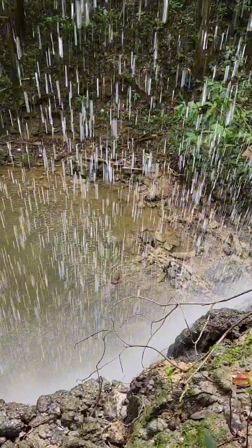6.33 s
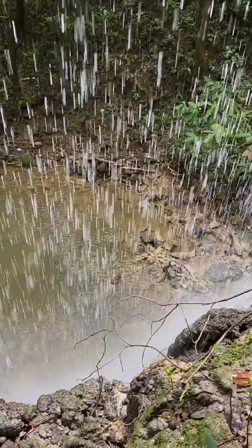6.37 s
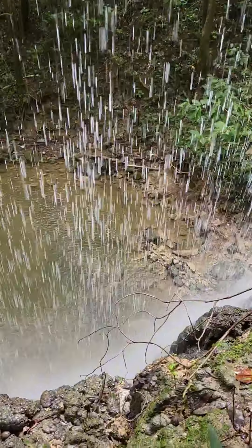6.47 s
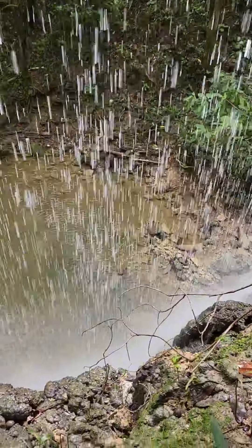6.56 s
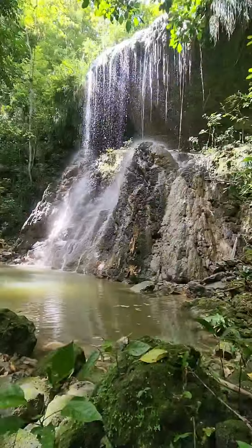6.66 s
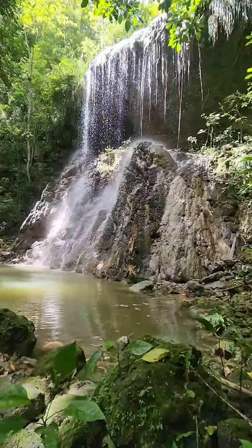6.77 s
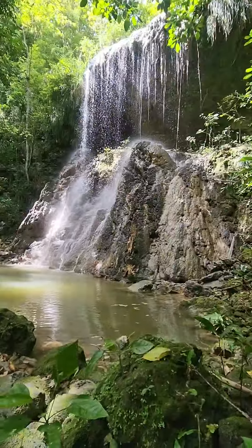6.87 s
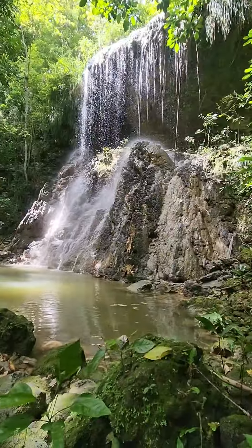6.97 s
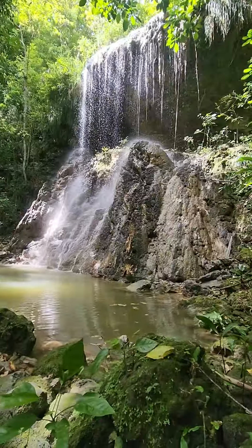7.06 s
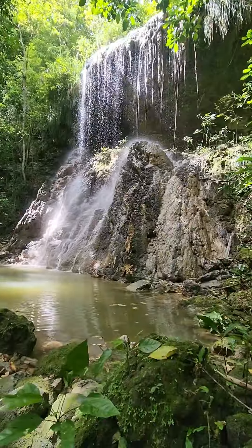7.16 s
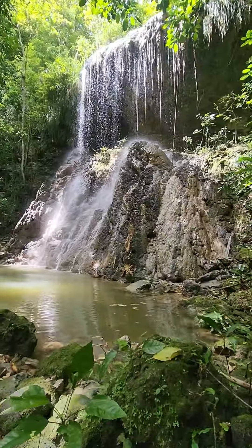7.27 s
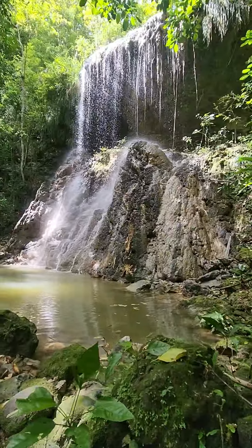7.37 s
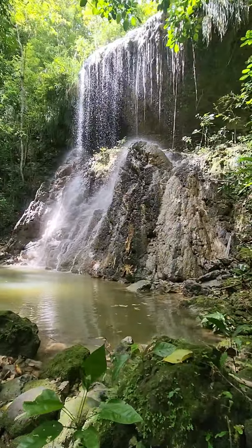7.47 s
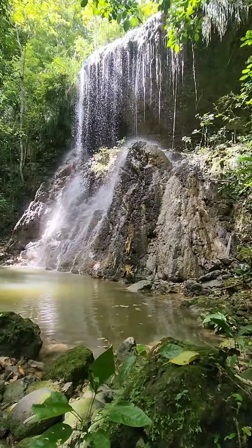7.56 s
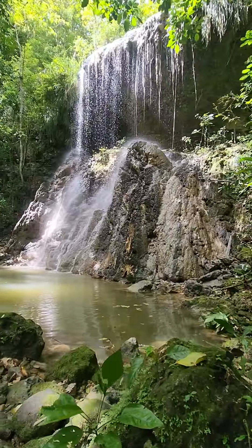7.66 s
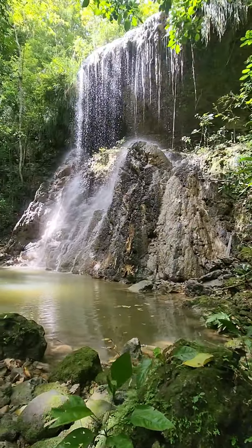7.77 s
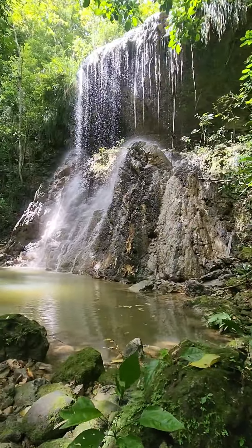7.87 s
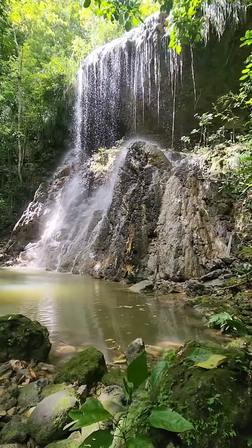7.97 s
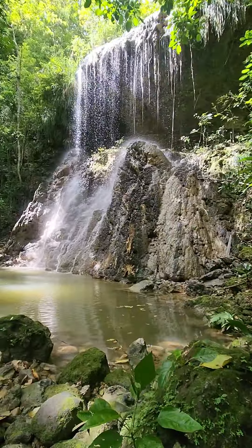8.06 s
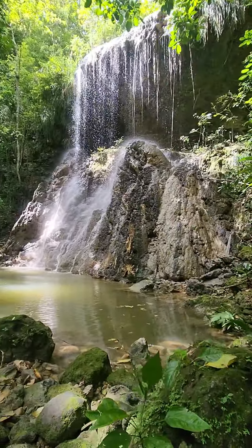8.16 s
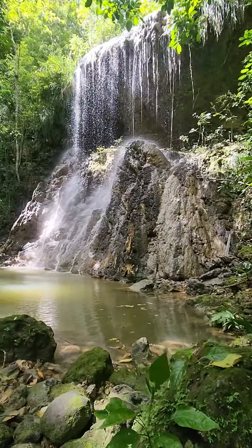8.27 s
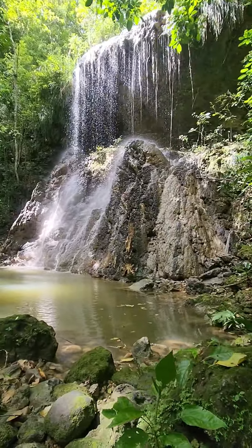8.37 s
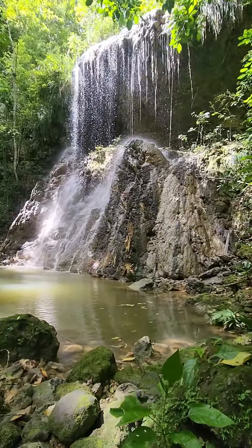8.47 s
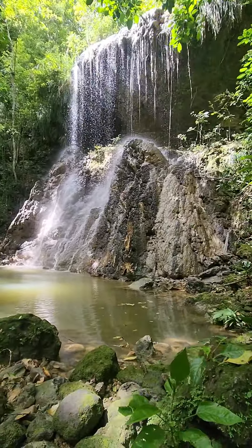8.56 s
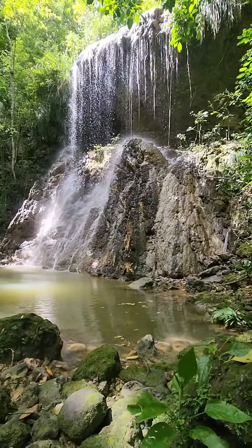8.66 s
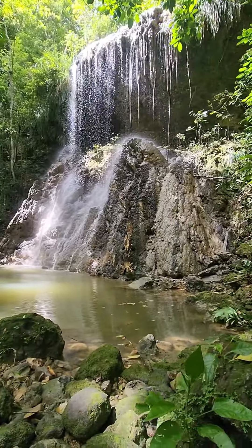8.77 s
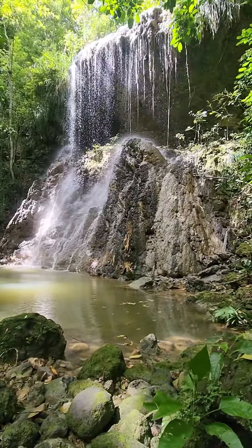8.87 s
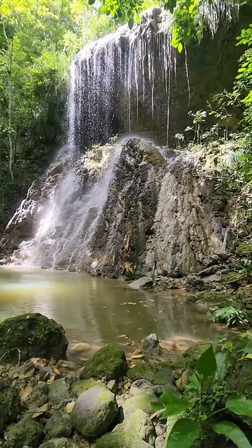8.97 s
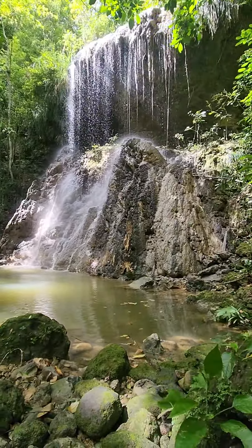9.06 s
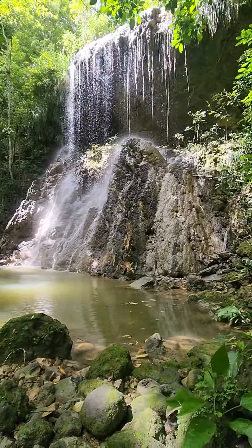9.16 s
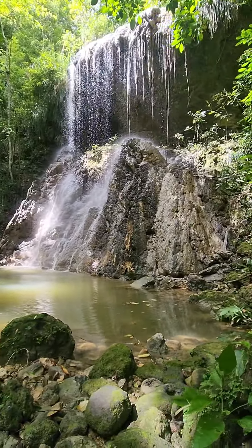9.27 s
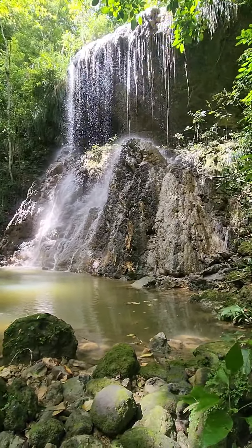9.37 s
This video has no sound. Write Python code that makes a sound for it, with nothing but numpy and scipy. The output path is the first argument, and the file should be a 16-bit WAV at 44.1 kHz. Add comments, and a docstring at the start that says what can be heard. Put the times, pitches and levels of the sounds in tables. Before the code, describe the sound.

Close under a small forest waterfall, a dense, bright stereo hiss of falling drops spatters on wet rock and into a shallow pool. Sharp ticks and wider wet slaps stand out, with small bubbles and faint low puffs of air. At about 6.6 seconds it cuts to a split second of silence, then a softer, smoother, steady hiss from across the pool continues to the end.

```python
"""A small forest waterfall, first from close by: its curtain of drops spatters on wet rock and into the pool.
Shaped noise makes the rush of countless splashes; random impacts add drops of every size, ringing tones add bubbles.
Near drops tick and slap out of it as noise bursts; a draught nudges the microphones as low, soft puffs of noise.
After a cut to a moment of silence, the fall is heard from across the pool as a smoother, softer hiss."""
import sys
import numpy as np
from scipy import signal
from scipy.fft import rfft, irfft, next_fast_len
from scipy.io import wavfile

SR = 44100
rng = np.random.default_rng(int(sys.argv[2]) if len(sys.argv) > 2 else 0)


def put_to_file(sound):
    """Save the sound as 16-bit audio at rate SR, in the file named by the first command-line argument."""
    columns = np.atleast_2d(sound).T  # one column per channel
    safe = np.clip(columns, -1, 1)
    whole_steps = np.round(safe * 32767)
    wavfile.write(sys.argv[1], SR, whole_steps.astype(np.int16))


N = 414981
TIME_S = np.arange(N) / SR

# spectrum at the foot of the fall, ahead of the view's trim: (frequency [Hz], left gain [dB], right gain [dB])
NEAR_SPECTRUM = [(170, -33, -32.5), (607, -31, -31.5), (1475, -25, -21), (2400, -22.5, -21.5),
                 (3320, -20.5, -22.5), (5330, -18, -9), (7040, -16.5, -9.2), (7330, -13.5, -6),
                 (7864, -17.5, -10.5), (8780, -27.5, -25.5), (10900, -23, -29), (12070, -20.5, -16.5),
                 (13350, -17.5, -16.5), (15700, -18.5, -29.7)]
# spectrum across the pool, ahead of the view's trim: (frequency [Hz], left gain [dB], right gain [dB])
FAR_SPECTRUM = [(140, -34, -34), (260, -38.5, -38), (650, -33, -33.7), (2150, -26.5, -25.5),
                (2800, -27, -29.5), (5500, -24, -20.5), (6900, -22.5, -21), (7500, -20.5, -17.5),
                (8050, -27.1, -21), (8860, -32.5, -35.5), (11000, -29.5, -36.4), (11900, -26, -24.5),
                (13100, -23.5, -25.9), (15700, -30.3, -26)]
# diffuse sound at two spaced microphones: (frequency [Hz], left-right correlation [-1..1])
DIFFUSE_CORRELATION = [(40, 0.96), (300, 0.92), (750, 0.54), (1200, 0.08), (1800, 0.17), (4000, -0.27),
                       (7000, 0.049)]
# slow turn of the microphones; each column is centred on its mean, then scaled where used:
# (time [s], fine spray [dB], left-right difference of the spatter [dB], churning [dB])
MICROPHONE_TURN = [(0, -26.5, -8.5, -40.7), (1, -25, -9.5, -41), (2, -24, -10, -41.5), (3, -23, -8, -40.5),
                   (4.2, -21.6, -7.5, -40.5), (5, -22, -7.2, -40.6), (6.5, -23, -6, -41)]
# thicker packets of water break off the curtain and land; swells are centred on their mean later:
# (time [s], swell of the pool's drops [dB], swell of the spatter on rock [dB])
WATER_PACKETS = [(0.01, 0.5, 3), (0.24, 2.5, 0), (0.43, 4, 0), (0.56, 2, 3), (0.97, 0, 1.5), (1.21, 1, 0.5),
                 (1.76, 1.5, 1), (3.27, 1, 1.5), (3.54, .5, 2), (3.84, 2.5, 2), (4.28, .5, 1.5),
                 (4.50, 1, 0.5), (4.88, 2.5, 2.5), (5.17, 3, 1.5), (5.92, 3, 2), (6.17, 1, 3),
                 (6.38, -1, 2.5)]
# thin stream that patters on wet stone, then wanders off it: (time [s], level ahead of band-pass and surges [dB])
STREAM_LEVEL = [(0, -1), (1.2, -0.5), (1.9, -5), (3.0, -14), (6.6, -18)]
# delay of the pool's drops at the left microphone: (time [s], lag [s])
POOL_LEFT_LAG = [(0, 0.0004), (1.5, 0.00034), (3.0, 0.00013), (6.6, 0.00012)]
# kinds of drop, heavy to fine: (low edge [Hz], high edge [Hz], rate ahead of clumping [1/s],
# size spread [dB per e-fold of chance], burst decay [s], level ahead of band-pass and mix [dB])
HEAVY_DROPS = (900, 4080, 560, 3.9, 0.0012, 1)
MEDIUM_DROPS = (1600, 8998, 380, 4, 0.1, -3.5)
LIGHT_DROPS = (4000, 7870, 1600, 2.9, 0.00047, 0.28)
FINE_DROPS = (8150, 16200, 1600, 4, 0.00064, 1.54)
# close drops bursting on rock: (time [s], level ahead of the common trim [dB], left-right difference [dB])
ROCK_TICKS = [(0.0512, -7.5, -6), (0.4312, -9.5, -11), (0.5622, -10.5, -14), (0.596, -10.5, -7),
              (0.6288, -10.5, -14), (1.2388, -8, -14), (1.4655, -8, -11), (1.5772, -9.5, -13),
              (2.0375, -11, -14), (2.0615, -10.5, -13), (2.375, -10, -10), (3.2922, -8, -6),
              (3.424, -2, -1), (4.5042, -9.5, -4), (4.9296, -7.5, -7), (5.2096, -6.5, -7),
              (5.5133, -6.5, -5), (6.1912, -9.5, -9), (6.2953, -11, -13)]
# close, heavy drops hitting the pool:
# (time [s], level ahead of the common trim [dB], left-right difference [dB], centre [Hz])
POOL_SLAPS = [(0.2309, -16.5, -3.5, 1900), (0.3915, -15, -3.5, 3000), (0.4728, -13.5, -5, 2300),
              (0.9852, -13.5, 1, 3700), (1.1837, -15.5, 0, 2800), (1.2116, -12.5, -5, 2700),
              (1.296, -17, -1.5, 3100), (1.8208, -12, -4, 3700), (2.1026, -16, 1, 2700),
              (2.3999, -13.5, -2, 2900), (3.861, -17, 2, 2600), (4.2053, -14, 6, 2500),
              (4.5241, -12, 1.5, 2700), (4.8065, -15.5, 2, 2000), (5.141, -15, 2, 2800),
              (5.4779, -14.5, 0, 1700), (6.0127, -18, 0, 3100), (6.1609, -17, 2, 2000),
              (6.5407, -14.5, -4, 1500)]
# soft low puffs, likely air pushed out by the falling water:
# (time [s], level ahead of the bass cut [dB], left-right difference [dB], centre [Hz])
AIR_PUFFS = [(2.38, -51, -2, 45), (2.62, -47.5, 5, 45), (2.92, -47, 6, 48), (3.23, -44, -6, 42),
             (3.63, -49, 1, 42), (4.52, -48.5, 1, 135), (4.98, -48, 7, 36)]

NEAR_END_S, FAR_START_S = 6.605, 6.703
PACKET_HALF_WIDTH_S = 0.048   # to 1/e
SWAY_CORNER_HZ, POOL_SWAY_DB, ROCK_SWAY_DB = 6.6, 0.64, 0.4
FAR_SWAY_CORNER_HZ, FAR_SWAY_DB = 5.6, 0.23   # distance evens the swaying out
ROCK_TRIM_DB = 0.2
CLOSE_DROP_S = 0.15   # longest splash
PUFF_HALF_WIDTH_S, PUFF_OWN_DB = 0.07, -6   # to 1/e; rumble that each channel has to itself
BASS_CUT_HZ, TOP_CUT_HZ = 33, 15780


def from_db(db):
    """Decibels to gain."""
    return 10 ** (np.asarray(db) / 20)


def rms_one(x):
    """Scale to unit power."""
    return x / np.sqrt(np.mean(x ** 2) + 1e-20)


def curve(rows):
    """Join a two-column time table, sample by sample."""
    return np.interp(TIME_S, *np.transpose(rows))


def swings_db(rows):
    """Each column of a time table, less the mean of its knots."""
    knots_s, *columns = np.transpose(rows)
    return [np.interp(TIME_S, knots_s, c - c.mean()) for c in columns]


def sides(pan_db):
    """Left and right gains for a level difference."""
    return from_db(np.array([[0.5], [-0.5]]) * pan_db)


def shaped(x, gain_at):
    """Filter by a gain that is a function of frequency."""
    size = next_fast_len(N + 4096)   # padding keeps the ends apart
    hz = np.maximum(np.arange(size // 2 + 1) * SR / size, 1)
    return irfft(rfft(x, size) * gain_at(hz), size)[..., :N]


def at_hz(rows, hz):
    """Columns of a frequency table, joined on a log-frequency axis."""
    knots_hz, *columns = np.transpose(rows)
    return np.array([np.interp(np.log(hz), np.log(knots_hz), c) for c in columns])


def coloured(x, spectrum):
    """Give each channel the colour of its place and its microphone port."""
    return shaped(x, lambda hz: from_db(at_hz(spectrum, hz)))


def band(x, low_hz, high_hz):
    """Causal band-pass."""
    sos = signal.butter(2, [low_hz, high_hz], "band", fs=SR, output="sos")
    return signal.sosfilt(sos, x)


def drift(corner_hz):
    """Slow random wander of unit rms: noise through a two-pole low-pass."""
    step, settle = 40, 2000   # samples per slow value; slow values dropped
    pole = np.exp(-2 * np.pi * corner_hz * step / SR)
    noise = rng.standard_normal(N // step + settle + 2)
    slow = signal.lfilter([1], [1, -2 * pole, pole ** 2], noise)[settle:]
    return np.interp(np.arange(N) / step, np.arange(len(slow)), rms_one(slow))


def surging_db():
    """Flow onto pool and rock about its mean: bell-shaped packets of water on a gentle random sway."""
    packet_s, pool_db, rock_db = np.transpose(WATER_PACKETS)
    bells = np.exp(-((TIME_S - packet_s[:, None]) / PACKET_HALF_WIDTH_S) ** 2)
    sway = drift(SWAY_CORNER_HZ)
    pool = pool_db @ bells + POOL_SWAY_DB * sway
    rock = rock_db @ bells + ROCK_SWAY_DB * sway
    return pool - pool.mean(), rock - rock.mean()


def rush():
    """Splashes too many to tell apart: white noise, much alike in both channels only in the bass."""
    mid, side = rng.standard_normal((2, N))
    mid = shaped(mid, lambda hz: np.sqrt((1 + at_hz(DIFFUSE_CORRELATION, hz)) / 2))
    side = shaped(side, lambda hz: np.sqrt((1 - at_hz(DIFFUSE_CORRELATION, hz)) / 2))
    return mid + side * [[1], [-1]]


def churning(bed, churn_db):
    """The pool's churning: the low part of the rush, with a swing of its own."""
    low = shaped(bed, lambda hz: 0.85 / (1 + (hz / 850) ** 4))
    return low * from_db(2.0 * churn_db)


def die_away(energy, decay_s):
    """Spread each impulse of energy over an exponential tail."""
    pole = np.exp(-1 / (decay_s * SR))
    return signal.lfilter([1 - pole], [1, -pole], energy + 1e-18)


def splash(energy, burst_s, spray_share, spray_s):
    """Impact noise whose power is shared by two decays, the burst and the spray it throws up."""
    burst = (1 - spray_share) * die_away(energy, burst_s)
    spray = spray_share * die_away(energy, spray_s)
    return np.sqrt(burst + spray) * rng.standard_normal(energy.shape)


def drops(kind, clumping_db, scatter_db, spray_share, spray_s):
    """Drops of one kind land at random, in clumps, each with its own size and direction."""
    low_hz, high_hz, per_s, spread_db, burst_s, level_db = kind
    chance, size, direction = rng.random((3, N))
    lands = np.flatnonzero(chance < per_s * from_db(clumping_db) / SR)
    size_db = -spread_db * np.log(size[lands] + 0.015)
    pan_db = scatter_db * (2 * direction[lands] - 1)
    energy = np.zeros((2, N))
    energy[:, lands] = (from_db(size_db) * sides(pan_db)) ** 2
    noise = splash(energy / energy.mean(), burst_s, spray_share, spray_s)
    return from_db(level_db) * band(noise, low_hz, high_hz)


def bubbles(per_s, low_hz, high_hz, cycles, spread_db):
    """Trapped air rings briefly, the small bubbles highest, each rising a little in pitch; rms 1."""
    out = np.zeros((2, N + SR))
    for when, pitch, size, pan in rng.random((int(per_s * N / SR), 4)):
        hz = low_hz * (high_hz / low_hz) ** pitch
        life = np.arange(0, 1, hz / (cycles * SR))   # 0 to 1 over the ring
        phase = 2 * np.pi * cycles * life * (1 + 0.03 * life)
        tone = hz * np.sin(phase) * from_db(-60 * life)
        size_db = -spread_db * np.log(size + 0.03)
        start = int(when * N)
        out[:, start:start + len(tone)] += tone * from_db(size_db) * sides(16 * (pan - 0.5))
    return rms_one(out[:, :N])


def from_the_right(x, lag_s, likeness):
    """Part of what the right microphone hears reaches the left one a moment later."""
    late = np.interp(TIME_S - lag_s, TIME_S, x[1])
    return np.array([np.sqrt(1 - likeness ** 2) * x[0] + likeness * late, x[1]])


def pool_splashes(clumps, pool_db, churn_db):
    """Heavy drops and a thin stream, delayed in part on the left, with bubbles."""
    heavy_clumping_db = 1.6 * clumps + 1.8 * drift(14)
    heavy = drops(HEAVY_DROPS, heavy_clumping_db, scatter_db=4.5, spray_share=0.32, spray_s=0.0092)
    heavy *= from_db(pool_db + 1.4 * churn_db)
    stream_kind = (2000, 4700, 298.5, 4.5, 0.2, 0)   # columns as for the kinds of drop
    stream = drops(stream_kind, 2.2 * drift(11), scatter_db=3, spray_share=0.36, spray_s=0.0057)
    stream *= from_db(curve(STREAM_LEVEL) + pool_db)
    pool = from_the_right(heavy + stream, curve(POOL_LEFT_LAG), likeness=0.53)
    ringing = bubbles(per_s=330, low_hz=502, high_hz=7420, cycles=52, spread_db=4.0)
    return pool + from_db(-12.5) * ringing


def rock_spatter(clumps, rock_db, turn_db):
    """Medium and light drops on rock, surging and panned by the turn of the microphones."""
    medium = drops(MEDIUM_DROPS, 2.3 * clumps, scatter_db=11, spray_share=0.46, spray_s=0.0081)
    light_clumping_db = 1.0 * clumps + 1.0 * drift(22)
    light = drops(LIGHT_DROPS, light_clumping_db, scatter_db=7, spray_share=0.35, spray_s=0.007)
    return (medium + light) * from_db(rock_db + ROCK_TRIM_DB) * sides(1.4 * turn_db)


def fine_spray(clumps, spray_db):
    """The finest drops, a high patter that swings as the microphones turn."""
    clumping_db = 1.2 * clumps + 1.6 * drift(11)
    fine = drops(FINE_DROPS, clumping_db, scatter_db=6, spray_share=0.42, spray_s=0.008)
    return fine * from_db(0.87 * spray_db)


def ground_echo(x, delay_s, strength, dull_hz):
    """Rough ground mirrors the lower tones, which ripples their spectrum."""
    def gain_at(hz):
        mirrored = strength / (1 + (hz / dull_hz) ** 2)
        return 1 + mirrored * np.exp(-2j * np.pi * hz * delay_s)
    return shaped(x, gain_at)


def close_drops(rows, width, crack_db, burst_s, spray_share, spray_s, trim_db):
    """Single drops by the microphones: a sharp crack and a noise burst, both in a band around the drop's pitch."""
    length = int(CLOSE_DROP_S * SR)
    out, impact = np.zeros((2, N)), np.zeros((2, length))
    impact[:, 0] = 1
    for at_s, level_db, pan_db, hz in rows:
        low_hz, high_hz = hz / width, hz * width
        burst = band(splash(impact * burst_s * SR, burst_s, spray_share, spray_s), low_hz, high_hz)
        # the burst passes the band twice, the crack once
        drop = band(burst + from_db(crack_db) * impact, low_hz, high_hz)
        start = int(at_s * SR)
        out[:, start:start + length] += from_db(level_db + trim_db) * sides(pan_db) * drop
    return out


def rock_ticks():
    """Close drops burst on rock: brief, high clicks."""
    rows = [(*tick, 5900) for tick in ROCK_TICKS]   # one centre for all [Hz]
    return close_drops(rows, width=1.31, crack_db=5, burst_s=0.0009,
                       spray_share=0.5, spray_s=0.0071, trim_db=5.5)


def pool_slaps():
    """Close, heavy drops hit the pool: wider, lower bursts."""
    return close_drops(POOL_SLAPS, width=1.67, crack_db=8.5, burst_s=0.0016,
                       spray_share=0.46, spray_s=0.0065, trim_db=6.0)


def near_fall():
    """Under the curtain: a bed of rush, the pool's churning and separate drops of every size."""
    pool_db, rock_db = surging_db()
    spray_db, turn_db, churn_db = swings_db(MICROPHONE_TURN)
    clumps = drift(15)   # the sheet of water tears into packets on its way down
    bed = rush()
    water = bed * from_db(0.77 * spray_db) + churning(bed, churn_db)
    water += pool_splashes(clumps, pool_db, churn_db)
    water += rock_spatter(clumps, rock_db, turn_db)
    water += fine_spray(clumps, spray_db)
    water = ground_echo(water, delay_s=0.00276, strength=0.1, dull_hz=1000)
    return from_db(-5.0) * coloured(water, NEAR_SPECTRUM) + rock_ticks() + pool_slaps()


def draught():
    """Puffs of air: band-passed noise under a bell-shaped swell, largely shared by both channels."""
    out = np.zeros((2, N))
    swell = np.exp(-((np.arange(SR) / SR - 0.5) / PUFF_HALF_WIDTH_S) ** 2)
    for at_s, level_db, pan_db, hz in AIR_PUFFS:
        air = rng.standard_normal(SR) + from_db(PUFF_OWN_DB) * rng.standard_normal((2, SR))
        rumble = rms_one(band(air, 0.75 * hz, 1.3 * hz))
        start = int((at_s - 0.5) * SR)
        out[:, start:start + SR] += from_db(level_db) * sides(pan_db) * swell * rumble
    return out


def far_fall():
    """From across the pool the drops all but melt into the rush."""
    flow_db = FAR_SWAY_DB * drift(FAR_SWAY_CORNER_HZ)
    patter_kind = (900, 15000, 900, 3.0, 0.2, -5.5)   # columns as for the kinds of drop
    patter = drops(patter_kind, 2.6 * drift(10), scatter_db=6, spray_share=0.59, spray_s=0.0075)
    ringing = bubbles(per_s=380, low_hz=605, high_hz=7020, cycles=53, spread_db=3.0)
    water = rush() + patter + from_db(-16.5) * ringing
    water = ground_echo(water, delay_s=0.00189, strength=0.12, dull_hz=2300)
    return from_db(flow_db - 1.22) * coloured(water, FAR_SPECTRUM)


def scene():
    """The close view drops, then fades briefly; after the silence the far view starts at once."""
    since_end_s = np.maximum(TIME_S - NEAR_END_S, 0)
    fade = np.where(TIME_S < NEAR_END_S, 1, 0.26 * np.exp(-since_end_s / 0.0041))
    return (near_fall() + draught()) * fade + far_fall() * (TIME_S >= FAR_START_S)


def record(dry):
    """The sharpest peaks are rounded off near full scale; the deepest bass and the top are cut."""
    rounded = dry / (1 + (dry / 0.9) ** 6) ** (1 / 6)

    def gain_at(hz):
        bass_cut = 1 / np.sqrt(1 + (BASS_CUT_HZ / hz) ** 4)
        return bass_cut / np.sqrt(1 + (hz / TOP_CUT_HZ) ** 400)
    return shaped(rounded, gain_at)


dry = scene()
out = record(dry)
put_to_file(out)
```